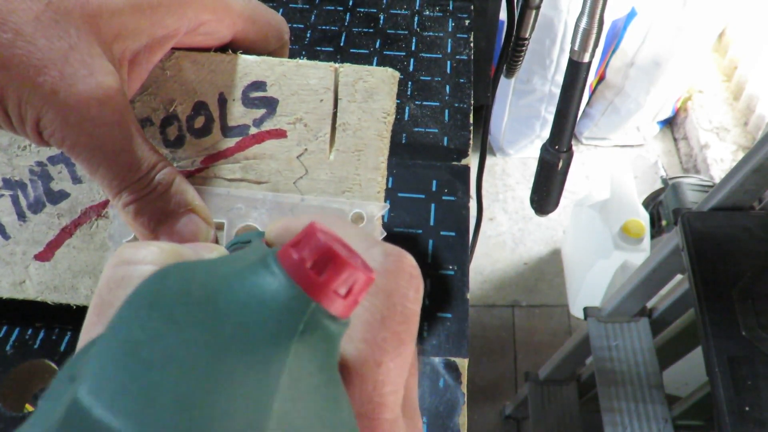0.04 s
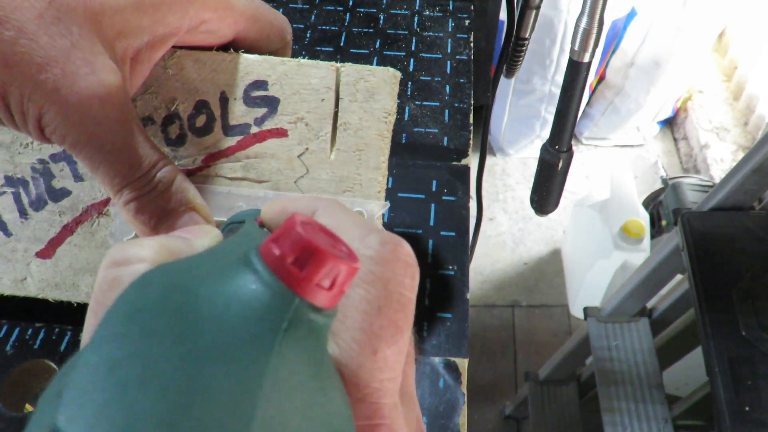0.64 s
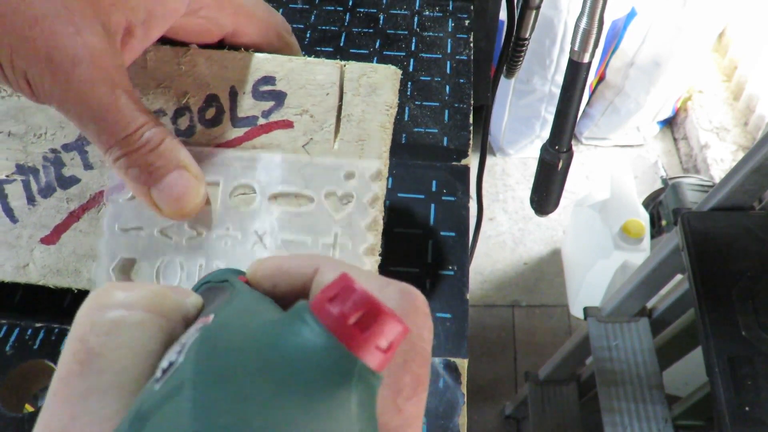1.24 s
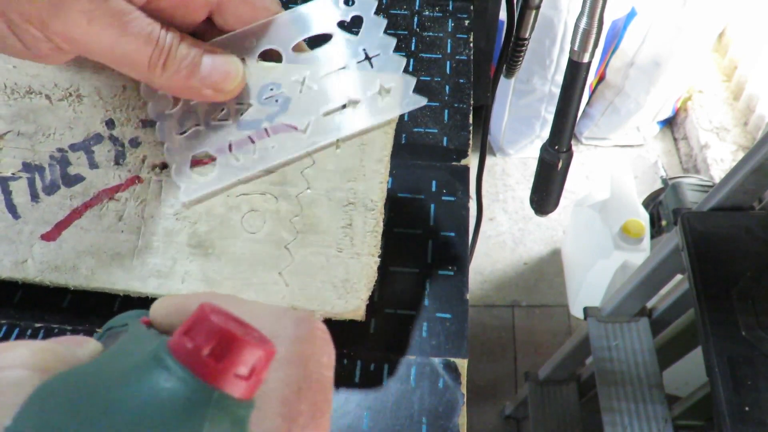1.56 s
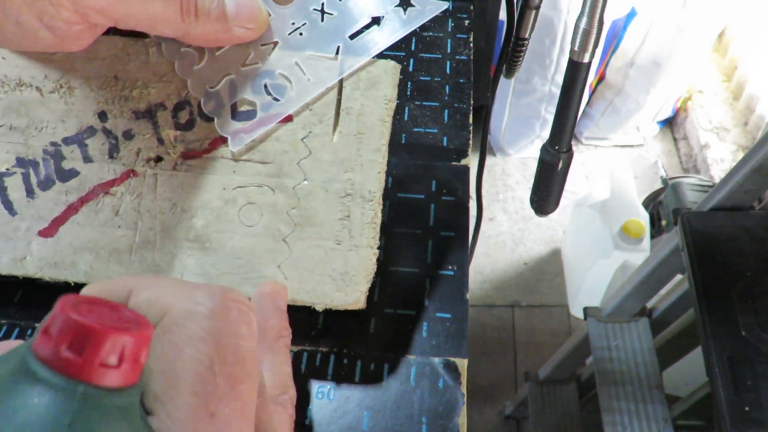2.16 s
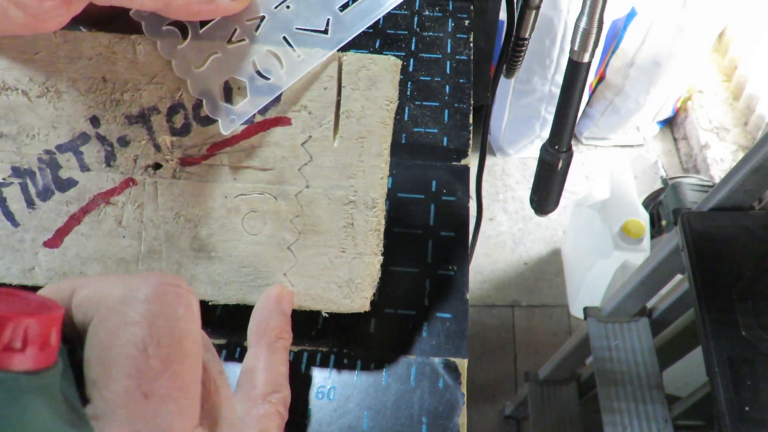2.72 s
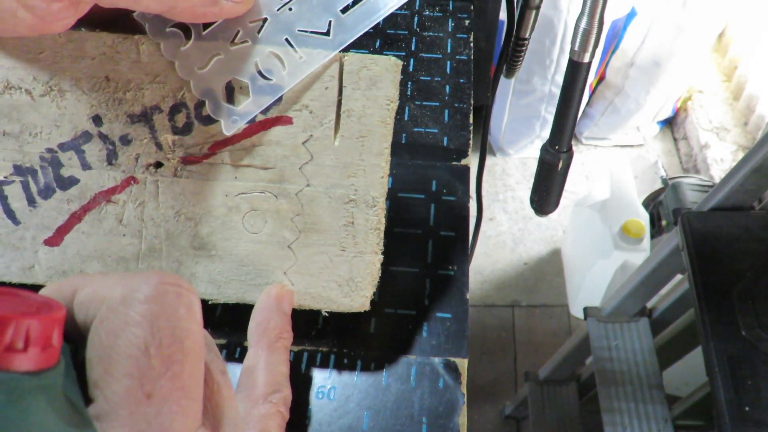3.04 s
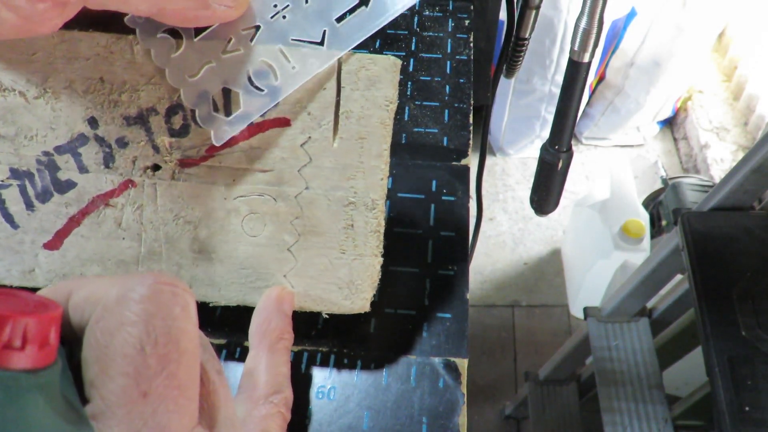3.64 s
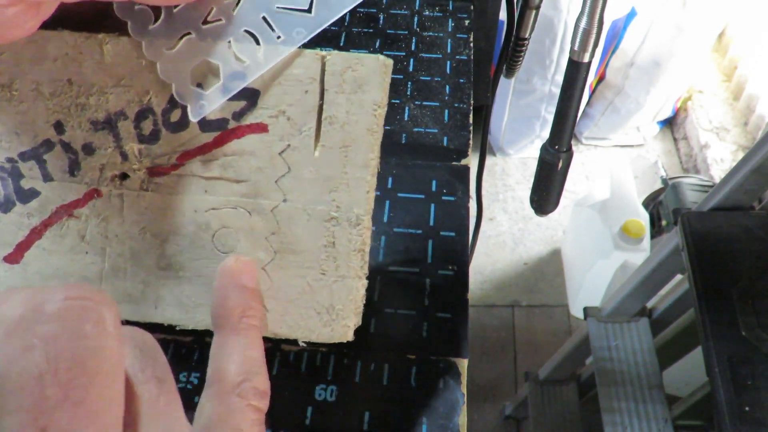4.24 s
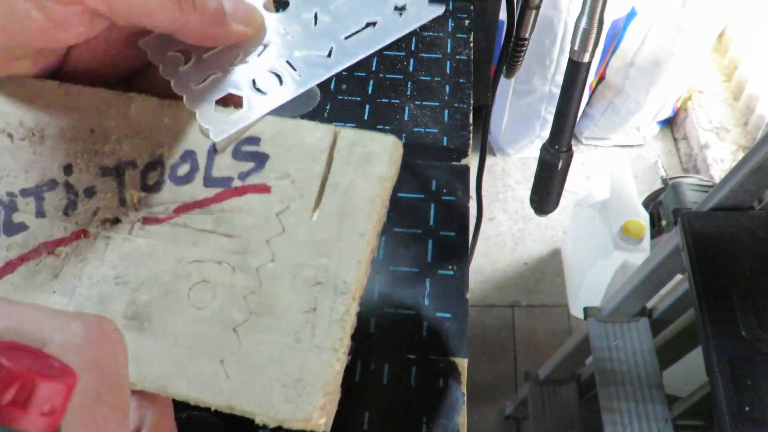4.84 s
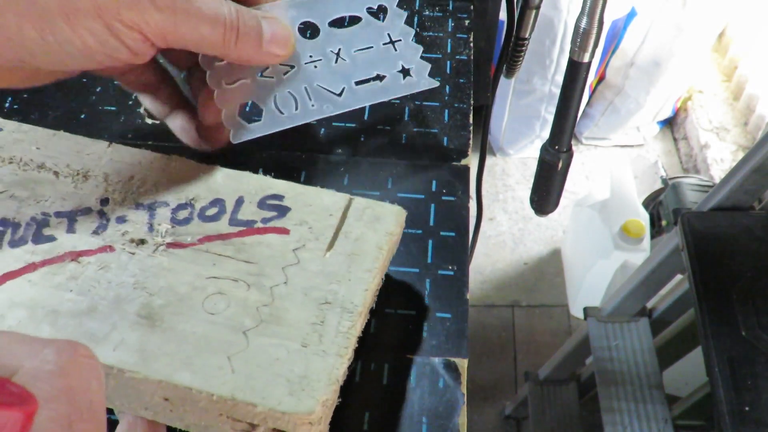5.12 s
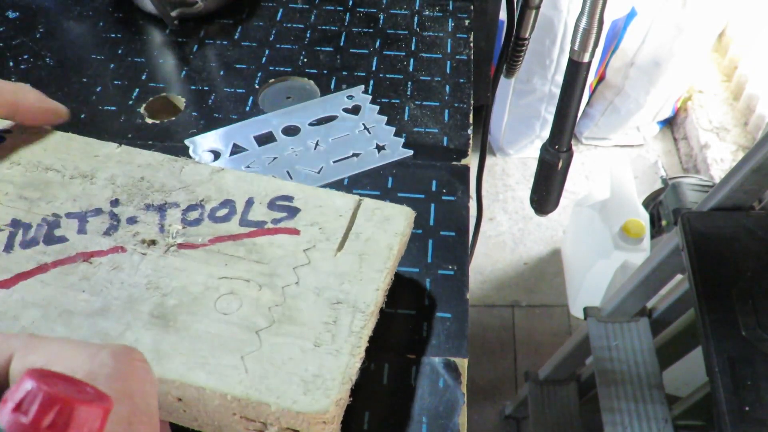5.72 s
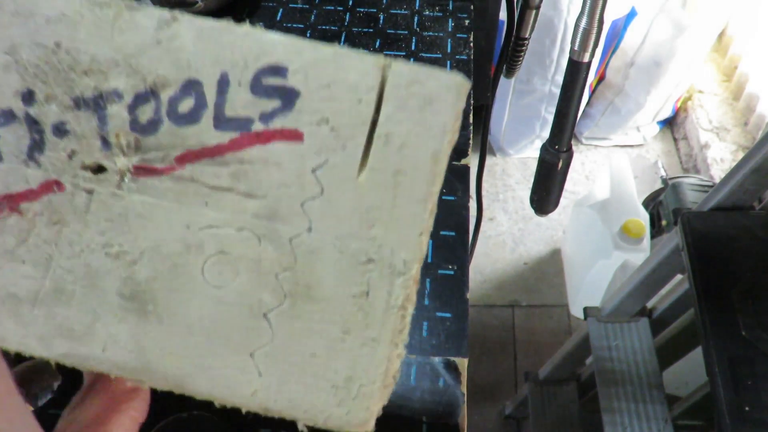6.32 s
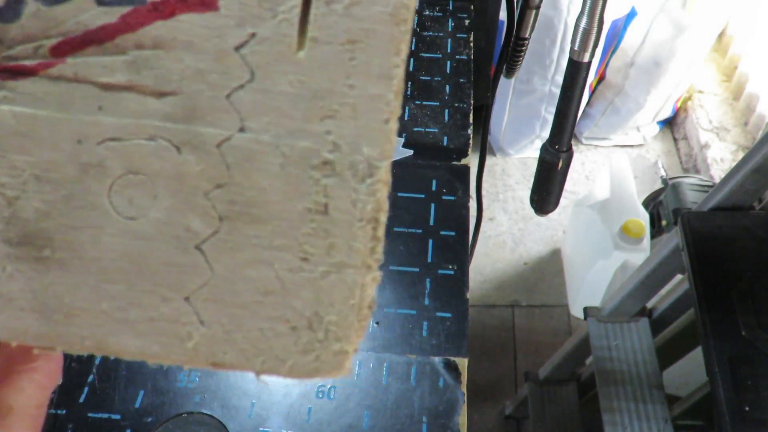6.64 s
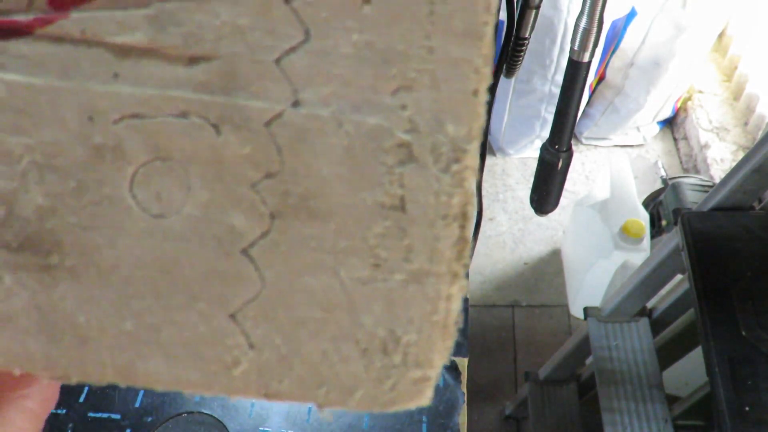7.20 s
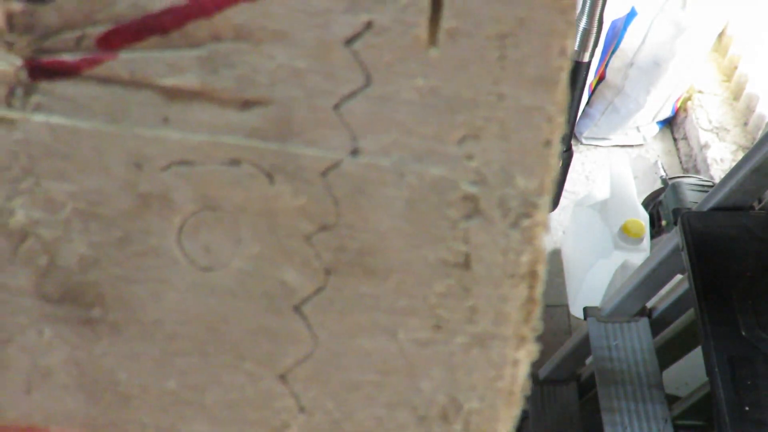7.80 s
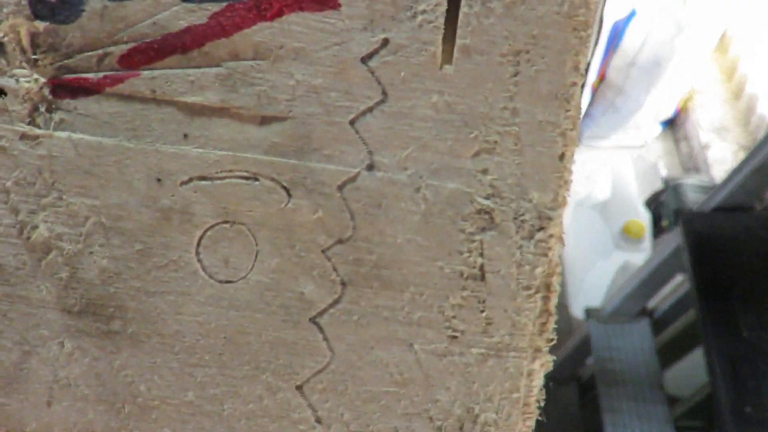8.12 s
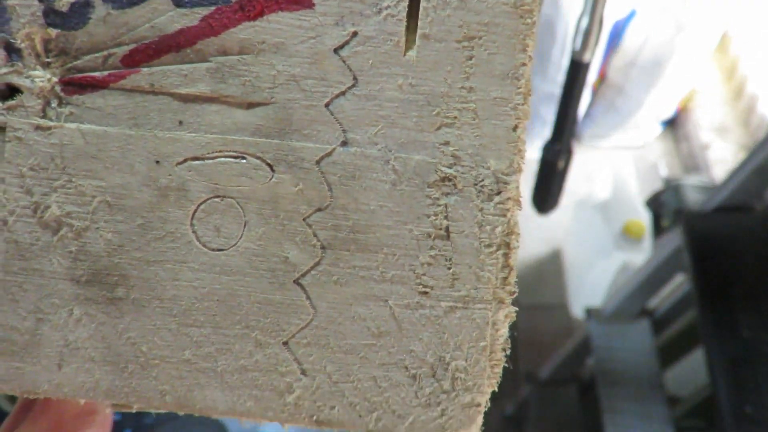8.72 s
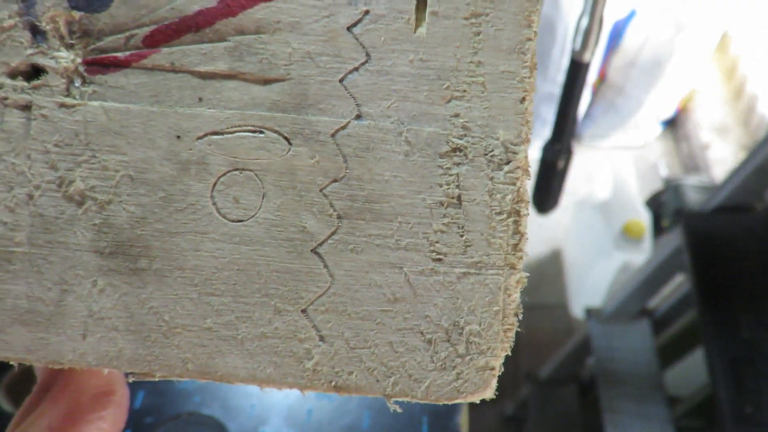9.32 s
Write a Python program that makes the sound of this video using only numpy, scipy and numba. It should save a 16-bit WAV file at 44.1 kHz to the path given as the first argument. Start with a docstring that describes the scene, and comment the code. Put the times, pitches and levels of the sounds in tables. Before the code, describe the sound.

Close up at a workbench open to a garden, an electric engraver hammers into a wooden board with a loud, harsh buzz. It chatters freely as it lifts and stops after about two seconds. Crickets, trilling frogs and whistling birds gradually swell in behind. The board bumps softly, then knocks sharply on the bench, and a plastic stencil ticks as it is put down. The garden sounds carry on to the end.

```python
"""At a workbench open to a garden, a mains engraver hammers its tip into a wooden board 100 times a second,
chatters freely when lifted, and stops. The board is bumped, knocked and rubbed on the bench, and a plastic
stencil ticks as it is put down. Outside, crickets chirp with their wings, frogs trill and birds whistle;
the camera's gain control pushes them down under each loud sound and lets them swell back."""
import sys
import numpy as np
from scipy import signal
from scipy.fft import rfft, irfft
from scipy.io import wavfile
from numba import njit

SR = 44100
rng = np.random.default_rng(int(sys.argv[2]) if len(sys.argv) > 2 else 0)


def inscribe(sig):
    """Save sig as 16-bit PCM at rate SR to the path in sys.argv[1].

    A 1-D sig is mono; a 2-D sig holds one channel per row.
    Samples are clipped to [-1, 1] before scaling.
    """
    pcm = np.round(np.clip(np.atleast_2d(sig).T, -1, 1) * 32767)
    wavfile.write(sys.argv[1], SR, pcm.astype(np.int16))


N = 421596
T = np.arange(N) / SR
SLOW = T[::32]  # clock for slow controls
TOOL_T, RING_T = T[:int(2.3 * SR)], T[:int(.12 * SR)]  # clocks for the tool's run and one stroke's ring
STROKE_HZ = 100
SKIP_BELOW, GRIP_ABOVE, TEAR_ABOVE = 0.268, 0.42, 0.679  # hand pressure (0-1): the tip skips, grips, tears

# Tone of the tip striking wood. Each row: frequency in Hz, gain in dB.
WOOD_TONE = [(60, -68), (150, -46), (300, -18), (500, -14.5), (800, -13.5), (1150, -9), (1600, -12),
             (2200, -6.5), (3000, -7.5), (4000, -6), (5000, -9), (6400, -8.5), (7500, -15), (14000, -14),
             (16000, -34)]


def undb(db):
    return 10 ** (np.asarray(db) / 20)


def unit(x):
    """Scale to rms 1."""
    return x / np.sqrt(np.mean(x ** 2))


def fade(t, t60):
    """A decay that loses 60 dB in t60 seconds."""
    return np.exp(-np.log(1000) * t / t60)


def ramp(x, start, end):
    """0 at start, 1 at end, flat beyond."""
    return np.clip((x - start) / (end - start), 0, 1)


def walk(rate, t):
    """A random drift with a spread near 1, turning rate times a second."""
    knots = rng.standard_normal(int(t[-1] * rate) + 2)
    return np.interp(t * rate, np.arange(len(knots)), knots)


def throb(hz, unsteady):
    """A sine on the slow clock, its rate drifting."""
    return np.sin(2 * np.pi * np.cumsum(hz * (1 + unsteady * walk(5, SLOW))) * SLOW[1])


def held(control):
    """Hold a slow control over every sample."""
    return np.repeat(control, 32)[:N]


def add(out, s, x):
    """Mix x in at s seconds."""
    i = int(s * SR)
    out[..., i:i + x.shape[-1]] += x[..., :N - i]


def through(x, response):
    """Pass a sound through an impulse response."""
    return signal.oaconvolve(np.atleast_2d(x), np.atleast_2d(response), axes=-1)[:, :x.shape[-1]]


def butter(x, order, hz, kind):
    return signal.sosfilt(signal.butter(order, hz, kind, fs=SR, output="sos"), x)


def colour(x, points):
    """Minimum-phase EQ through (Hz, dB) points."""
    hz, db = np.transpose(points)
    gain = undb(np.interp(np.log(np.fft.rfftfreq(2048, 1 / SR) + 1), np.log(hz), db))
    cepstrum = irfft(np.log(gain))
    cepstrum[1:1024] *= 2
    cepstrum[1025:] = 0
    return through(x, irfft(np.exp(rfft(cepstrum))))


def ports(pair):
    """Left and right microphone ports from a mid and a side: narrow in the mids, wide in the treble."""
    # Stereo width. Each row: frequency in Hz, side gain in dB.
    width = [(40, 0), (120, -31), (300, -21), (1300, -19), (2100, -28.5), (4400, -8.5), (8000, -1),
             (13000, 2)]
    return pair[0] + colour(pair[1], width) * np.array([[1], [-1]])


def echoes(envelope):
    """A diffuse stereo tail under an envelope."""
    return ports(rng.standard_normal((2, len(envelope))) * envelope / np.linalg.norm(envelope))


def scatter(envelope):
    """Dense stereo reflections under an envelope, evened out towards a flat spectrum."""
    size = len(envelope)
    limit = 3 * envelope / np.linalg.norm(envelope)
    reflections = rng.standard_normal((2, size)) * envelope
    for _ in range(3):
        spectrum = rfft(reflections, 2 * size)
        reflections = np.clip(irfft(spectrum / np.abs(spectrum))[:, :size], -limit, limit)
    return ports(reflections)


def band(hz, width_hz, size):
    """Two unrelated noises in one steep resonance."""
    section = np.concatenate(signal.iirpeak(hz, hz / width_hz / 1.5, fs=SR))
    return unit(signal.sosfilt([section, section], rng.random((2, size)) - .5))


def clicks(times, sizes):
    """Impulses on the tool's clock, placed finely between the samples."""
    at = np.maximum(times * SR, 8)[:, None]
    near = at.astype(int) + np.arange(-7, 9)
    shape = np.sinc(near - at) * np.sinc((near - at) / 8)
    return np.bincount(near.ravel(), (sizes[:, None] * shape).ravel(), len(TOOL_T))


def ring(modes, t, damping=1, sag_hz=0, sag_s=0.017):
    """Modes decaying after a blow; the lowest starts sag_hz sharp and sinks, higher ones less so."""
    extra_cycles = sag_hz * sag_s * (1 - np.exp(-t / sag_s))
    out = 0
    for hz, t60, db in modes:
        cycles = hz * t + extra_cycles * (modes[0][0] / hz) ** 2
        out += undb(db) * fade(t, t60 / damping) * np.cos(2 * np.pi * cycles)
    return out


def resonate(strokes, hz, t60):
    """A resonance rung by every stroke while its pitch moves."""
    turn = np.exp(2j * np.pi * np.cumsum(hz) / SR)
    t = T[:SR // 10]
    return unit(np.imag(turn * through(strokes / turn, fade(t, t60) - fade(t, t60 / 3))))


def sweep(length, start_hz, end_hz, waver, bend=1, soft=0.37):
    """A soft-edged gliding tone; with a bend under 1 it glides fastest at first."""
    t = T[:int(length * SR)]
    hz = (start_hz + (end_hz - start_hz) * (t / length) ** bend) * (1 + waver * walk(303.2, t))
    return np.sin(2 * np.pi * np.cumsum(hz) / SR) * signal.windows.tukey(len(t), soft)


def garden(x, wet_db, t60, pan_db=2):
    """A far call arrives from a little to the right, with echoes from walls and leaves."""
    t = T[:int(.6 * SR)]
    direct = ports(np.array([x, np.roll(x, 3)]))
    tail = through(x, echoes(fade(t, t60) * (1 - 0.15 * fade(t, 0.097))))
    return (direct + undb(wet_db) * tail) * undb(np.array([[-pan_db], [pan_db]]) / 2)


def hand(t):
    """The hand's pressure and what follows from it: contact, glancing and tearing, each 0-1."""
    # The hand digs the tip in, eases off, then lifts it. Each row: time in seconds, pressure from 0 to 1.
    gesture = [(0, 0.41), (.65, 0.47), (.85, 0.79), (.93, 0.83), (1.065, 0.9), (1.105, 0.84), (1.16, 0.26),
               (1.5, 0.27), (1.61, 0.21), (1.665, 0.18), (1.7, 0.07)]
    pressure = np.interp(t, *np.transpose(gesture))
    contact = ramp(pressure, 0, SKIP_BELOW)
    glancing = contact * ramp(pressure, GRIP_ABOVE, SKIP_BELOW)
    return pressure, contact, glancing, ramp(pressure, TEAR_ABOVE, 1)


def hammering(first_s=.0059, count=194, click_t60=0.021, porch_t60=0.12, porch_db=-8):
    """Stroke times and blows: the tip lands, rattles and rebounds; unloaded, it limps strong-weak."""
    # Contacts within a stroke. Each row: delay as a share of the rebound time, relative level in dB.
    contacts = [(0, -11.5), (0.252, -29), (0.422, -8), (0.999, -11.5), (1.377, -11.5)]
    # Tone of the blows in free air. Each row: frequency in Hz, gain in dB.
    free_tone = [(47, -70), (80, -29), (271, -40), (420, -21), (560, -9), (820, -0.5), (1120, 1),
                 (1490, -10.5), (1860, 0), (2270, -10.5), (2600, -11), (3100, -8.5), (3700, -2.5),
                 (4650, -7.5), (5000, -8.5), (6030, -7.5), (7000, -10), (8600, -18), (14000, -9.5),
                 (16000, -12)]
    beat = first_s + np.arange(count) / STROKE_HZ
    _, touch, _, tear = hand(beat)
    airborne = ramp(touch, 0.502, 0)
    rebound_ms = (1 - airborne) * (2.65 + 0.174 * beat) + airborne * 1.61  # creeps up along the groove
    skipping = 6.5 * touch * (1 - touch) ** 2
    jitter_ms = 0.0075 + 0.011 * tear + 0.337 * skipping + 0.212 * airborne
    limp_ms = 1.4 * ramp(beat, 1.74, 1.83)
    swing_ms = limp_ms * (-1) ** np.arange(count)
    starts = beat + (swing_ms + 0.25 * limp_ms + jitter_ms * rng.standard_normal(count)) / 1000
    grains_crossed = np.cumsum(6.03 + 14.5 * tear) / STROKE_HZ
    blows = 0
    for share, db in contacts:
        lag_ms = share * (rebound_ms + 0.029 * walk(9.03, beat) + jitter_ms * rng.standard_normal(count))
        uneven_db = (1.76 + 1.6 * airborne) * rng.standard_normal(count)
        force = undb(db + uneven_db - 1.4 * swing_ms)  # late strokes are weak
        # the wood answers a little differently as the tip moves over the grain
        grain = 0.92 * walk(0.97, grains_crossed)
        for weight in (np.cos(grain), np.sin(grain)):
            response = scatter(fade(RING_T, click_t60)) + undb(porch_db) * echoes(fade(RING_T, porch_t60))
            blows += through(clicks(starts + lag_ms / 1000, weight * force), response)
    _, contact, glancing, tearing = hand(TOOL_T)
    on_wood = np.sqrt(contact) * unit(colour(blows, WOOD_TONE))
    in_air = 0.95 * np.sqrt(1 - contact) * unit(colour(blows, free_tone))
    blows = on_wood + in_air
    extra_treble = undb(0.5 + 3.5 * glancing + 1.7 * tearing) - 1
    return starts, blows + extra_treble * butter(blows, 1, 7000, "high")


def housing_buzz(strokes, contact):
    """Every stroke rings the tool's housing, harder when the tip meets wood."""
    # Housing modes. Each row: frequency in Hz, t60 in seconds, relative level in dB.
    modes = [(274, 0.03, -16), (504, 0.033, -2), (678, 0.051, -1.5), (1390, 0.02, 7.5), (1914, 0.036, 9.5),
             (2619, 0.12, 7.5), (3910, 0.037, 1)]
    return undb(9) * (0.34 + 0.79 * contact) * unit(through(strokes, ring(modes, RING_T)))


def board_drone(strokes, contact):
    """The strokes drive the board's main resonance, which sinks as the hand eases off."""
    # Path of that resonance. Each row: time in seconds, pitch in Hz.
    pitch_path = [(0, 1100), (1.09, 1100), (1.14, 1025), (1.5, 1020), (1.57, 940), (1.9, 940)]
    hz = np.interp(TOOL_T, *np.transpose(pitch_path))
    return undb(14) * (0.032 + 0.6 * contact) * resonate(strokes, hz, t60=0.027)


def scrape(strokes, gate, contact, tearing, tear_db=16):
    """The cut rasps and the fibres ring, far louder while they tear."""
    # Torn fibres. Each row: frequency in Hz, t60 in seconds, relative level in dB.
    modes = [(1273, 0.074, 1.5), (1476, 0.027, 0.5), (1760, 0.011, 1.5), (3634, 0.011, -2.5),
             (4050, 0.019, 2), (4320, 0.009, -6), (4840, .014, -5)]
    fibres = sum(undb(db) * resonate(strokes, hz * (1 + .015 * walk(24.96, TOOL_T)), t60)
                 for hz, t60, db in modes)
    rasp = undb(-2) * gate * ports(band(1600, 1100, len(TOOL_T)))
    return (rasp + fibres) * contact * undb(-1.5 + tear_db * tearing)


def tip_ring(strokes, swell_s=0.14, unfavoured_db=-5, tear_db=-5, detune=0.0023, grain_hz=13.9):
    """The tip's modes swell in turn as the cut curves; the grain detunes them and tearing lowers them."""
    # Modes of the tip and holder. Each row: frequency in Hz, t60 in seconds, relative level in dB under
    # a light hand, the same under a firm hand, time in seconds when the cut's direction favours it most.
    modes = [(1764, 0.024, -5, 6, 0.54), (1895, 0.044, -1.5, -5, .2), (2605, 0.16, 1, 7.5, .55),
             (2842, 0.091, -1, 5.5, 0.94), (3240, 0.034, 0, -17, .3), (3520, 0.041, -15, 3.5, 1),
             (3630, .08, 0, -6, 0.65), (3900, 0.026, 7.5, -11, .1), (4100, 0.02, -10, 6, .62),
             (4565, 0.03, 9, -11, .05), (4855, 0.021, -11, 6, 0.5), (5450, 0.019, -3, 10.5, 0.079),
             (5850, 0.017, -18, 8.5, .75), (6470, 0.02, 0, 1, 0.73), (6750, 0.043, -8, 2, .05)]
    pressure, contact, _, tearing = hand(TOOL_T)
    firm = ramp(pressure, SKIP_BELOW, GRIP_ABOVE)
    out = 0
    for hz, t60, light_db, firm_db, favoured_s in modes:
        favour = np.exp(-.5 * ((TOOL_T - favoured_s) / swell_s) ** 2)
        cutting_db = firm_db + unfavoured_db * (1 - favour)
        flicker_db = 0.5 * walk(grain_hz, TOOL_T)
        db = light_db + (cutting_db - light_db) * firm + tear_db * tearing + flicker_db
        out += undb(db) * resonate(strokes, hz * (1 + detune * walk(grain_hz, TOOL_T)), t60)
    return contact ** 2 * out


def tip_skid(strokes, contact):
    """A tiny falling chirp in every stroke, strongest as the tip skids just before leaving the wood."""
    skidding = np.exp(-((contact - 0.88) / 0.11) ** 2)
    chirp = sweep(length=0.0024, start_hz=4710, end_hz=3680, waver=0)
    return undb(13) * skidding * unit(through(strokes, chirp))


def close_up(pair):
    """The tool is so close that the two ports hear its treble less alike."""
    # Width at close range. Each row: frequency in Hz, extra side gain in dB.
    near_width = [(1400, -15.5), (1800, -28), (2200, 19), (2700, 10.5), (4000, 4.5), (5500, 3.5),
                  (7000, -2), (11000, 1), (13200, -1.5), (15000, 6.5)]
    mid, side = (pair[0] + pair[1]) / 2, (pair[0] - pair[1]) / 2
    return mid + colour(side, near_width) * np.array([[1], [-1]])


def engraver(press_db=5.5):
    """One train of strokes drives the housing, board, fibres and tip; pressing makes it all louder."""
    starts, blows = hammering()
    pressure, contact, _, tearing = hand(TOOL_T)
    _, touch, _, _ = hand(starts)
    strokes = clicks(starts, (0.75 + 0.28 * touch) * undb(0.96 * rng.standard_normal(len(starts))))
    gate = unit(through(strokes, fade(RING_T, 0.055) - fade(RING_T, 0.001)))  # noise pulses with each stroke
    tool = undb(16.5) * blows + housing_buzz(strokes, contact) + board_drone(strokes, contact)
    tool += tip_skid(strokes, contact) + scrape(strokes, gate, contact, tearing)
    grit = unit(colour(ports(rng.standard_normal((2, len(TOOL_T)))), WOOD_TONE))
    tool += undb(4) * (0.5 + 0.9 * contact) * gate * grit + tip_ring(strokes)
    # a small tool radiates little bass; a faint rumble lies under it, stronger when it shakes freely
    tool = butter(tool, 3, 290, "high")
    rumble = undb(-22 + 9 * (1 - contact)) * gate * ports(band(85, 110, len(TOOL_T)))
    out = np.zeros((2, N))
    add(out, 0, undb(-11.5 + press_db * pressure) * (close_up(tool) + rumble))
    return out


def far_chorus(bed_db=-44, drift_db=3):
    """Distant insects and frogs, each kind pulsing in its own band, over a soft bed of noise."""
    # Outdoor background noise with a steady, high microphone hiss. Each row: frequency in Hz, gain in dB.
    bed_tone = [(30, 4.5), (100, -0.5), (160, -6), (230, -3.5), (380, -1), (800, 0), (1400, 1.5), (2100, 3),
                (2750, 2), (3700, -1), (4400, 0.5), (6000, -16.5), (7500, -0.5), (8500, -9.5),
                (12300, -5.5), (13200, 3), (13900, -3), (14500, -31), (15000, -59.5)]
    # The callers. Each row: pitch in Hz, bandwidth in Hz, level in dB, pulses a second, pulse depth in dB.
    callers = [(1016, 65, -57, 3.9, 6), (1580, 75, -60, 4, 10), (1990, 140, -48, 33, 1.5),
               (2405, 170, -52.5, 6, 2.5), (2874, 90, -55, 19, 3.5), (3003, 72, -48.5, 33, 0),
               (3500, 190, -63, 9, 5), (3940, 160, -51, 28, 2.5), (4406, 120, -46.5, 29, 3),
               (4940, 145, -43, 27, 0.5), (5290, 570, -46, 47, -2), (5506, 86, -46.5, 21, -1.5),
               (6540, 260, -50.5, 23, 0.5), (6825, 69, -54.5, 17, 5.5)]
    out = held(undb(bed_db + .5 * walk(1.318, SLOW))) * unit(colour(rng.standard_normal((2, N)), bed_tone))
    for hz, width_hz, db, pulse_hz, depth_db in callers:
        pulsing = unit(undb(depth_db * throb(pulse_hz, 0.1506) + drift_db * walk(5, SLOW)))
        out += held(undb(db) * pulsing) * band(hz, width_hz, N)
    return out


def board_knocks(crack_t60=0.017, tail_db=-16, tail_t60=0.15):
    """The board cracks against the bench and rings, duller for a softer contact."""
    # Knocks. Each row: start in seconds, ring gain in dB, crack gain in dB, brightness as a cutoff in Hz,
    # damping by the hand as a factor (1 is free).
    knocks = [(1.134, 12, -14, 282, 3.9), (2.448, -14.5, -19, 570, 1.64), (2.476, -14, -24, 234, 1),
              (4.147, -43, -21, 1200, 2.3), (5.1837, 2.5, 29, 3550, 0.96), (5.2, -26.5, -8, 2400, 1.3),
              (5.206, -28, -4, 1600, 2), (5.217, -17, -8, 2500, 1.9), (5.2321, -26.5, -5, 2600, 2.5),
              (5.2457, -16, 1, 2100, 2.6), (5.607, -36, -13, 1100, 2.4)]
    # Modes of the free board. Each row: frequency in Hz, t60 in seconds, relative level in dB.
    modes = [(286, 0.19, -12.5), (358, 0.043, -24), (472, 0.15, -3), (620, 0.094, -17.5),
             (890, 0.16, -11.5), (1124, 0.18, 8), (1660, 0.028, -5), (1630, 0.024, 6.5), (2650, 0.031, 3),
             (3360, 0.048, -11)]
    # Tone of wood cracking on the bench. Each row: frequency in Hz, gain in dB.
    crack_tone = [(40, -35), (160, -45), (280, 3), (700, -8.5), (1600, 9), (3000, -1.5), (6000, -18),
                  (15000, -26.5)]
    out, t = np.zeros((2, N)), T[:SR // 2]
    for s, ring_db, crack_db, bright_hz, damping in knocks:
        crack = colour(scatter(fade(t, crack_t60)) + undb(tail_db) * echoes(fade(t, tail_t60)), crack_tone)
        body = ring(modes, t, damping, sag_hz=50)  # pressed against the bench, it starts sharp
        knock = undb(ring_db) * body + undb(crack_db) * crack / np.abs(crack).max()
        add(out, s, butter(knock, 2, [140, bright_hz], "band"))
    return out


def birds_and_far_frogs(rise_ratio=1.363, rise_s=.084, top_note_hz=7970):
    """A bird's rising whistles, smeared by echoes; short bird peeps and the held notes of distant frogs."""
    # Rising whistles. Each row: start in seconds, starting pitch in Hz, relative level in dB.
    whistle_notes = [(3.18, 3170, -43.5), (3.52, 6500, -36.5), (4.41, 3100, -43), (6.04, 3180, -42),
                     (6.2, 6440, -30), (6.887, 5670, -29), (6.93, 3000, -41.5), (7.274, 5560, -28),
                     (7.55, 3240, -39.5), (7.645, 5690, -27.5), (8.031, 5580, -29.5), (8.615, 3240, -42),
                     (9.4, 3100, -38)]
    # Bird peeps and frog notes. Each row: start and length in seconds, first and last pitch in Hz,
    # relative level in dB.
    short_calls = [(2.47, 0.041, 2280, 2560, -43), (2.515, 0.044, 1450, 1300, -48),
                   (2.572, 0.059, 2160, 1960, -50), (2.66, 0.051, 2330, 2540, -38.5),
                   (2.776, .06, 1590, 1320, -48), (2.892, 0.046, 1027, 980, -50),
                   (2.915, 0.05, 2000, 1910, -45), (3.058, 0.05, 1400, 1305, -49),
                   (3.093, .035, 3430, 3520, -46), (3.13, 0.06, 7600, 7330, -46),
                   (3.221, 0.12, 2076, 2030, -44.5), (3.442, 0.041, 1890, 2230, -51),
                   (3.499, 0.07, 1042, 1010, -55), (3.6, 0.071, 1670, 1480, -47),
                   (3.659, 0.1, 3000, 2980, -44.5), (3.917, 0.047, 1366, 1310, -48),
                   (3.932, 0.05, 7350, 7500, -44.5), (3.936, 0.065, 2020, 2030, -42.5),
                   (4.501, .14, 2025, 1940, -43), (4.78, 0.13, 3430, 3500, -50),
                   (7.52, 0.08, 8420, 8340, -38), (7.899, 0.1, 8400, 8160, -47),
                   (8.953, 0.048, 7500, 7470, -41)]
    whistles, calls = np.zeros((2, N))
    for s, start_hz, db in whistle_notes:
        end_hz = min(start_hz * rise_ratio, top_note_hz)
        add(whistles, s, undb(db) * sweep(rise_s, start_hz, end_hz, waver=0.0247, bend=0.99))
    for s, length, start_hz, end_hz, db in short_calls:
        add(calls, s, undb(db) * sweep(length, start_hz, end_hz, waver=0.0082))
    return undb(-4) * garden(whistles, wet_db=4, t60=0.53) + undb(1.5) * garden(calls, wet_db=-4, t60=0.56)


def cricket(spacing_s=.033, stroke_s=.026, high_hz=5220, low_hz=4450, fall_t60=0.12):
    """Three wing strokes a chirp, each falling in pitch as the wing slows."""
    # A near cricket's chirps. Each row: time of the middle stroke in seconds, level in dB.
    chirps = [(2.61, -37), (2.887, -29.5), (3.137, -29), (3.405, -32.5), (3.665, -30), (3.925, -29.5),
              (4.19, -29.5), (4.44, -28.5), (4.697, -29), (4.955, -34), (5.368, -27), (5.59, -26.5),
              (5.841, -25.5), (6.133, -22), (6.95, -29.5), (7.184, -31.5), (7.439, -28), (7.69, -30),
              (7.95, -28), (8.189, -30), (8.468, -29), (8.69, -28.5), (8.947, -32), (9.229, -32),
              (9.5, -28)]
    out = np.zeros(N)
    for s, db in chirps:
        for k in (-1, 0, 1):
            start_hz = high_hz * (1 + 0.011 * rng.standard_normal())
            stroke = sweep(stroke_s, start_hz, low_hz, waver=0.014, soft=0.43)
            stroke *= fade(T[:len(stroke)], fall_t60)
            add(out, s + k * spacing_s - stroke_s / 3, undb(db + rng.standard_normal()) * stroke)
    return garden(out, wet_db=-0.5, t60=0.18)


def stencil_ticks(tick_t60=0.0065, tail_db=-14, tail_t60=0.1):
    """The plastic stencil lands in bright ticks, each with a short, noisy echo."""
    # Ticks. Each row: start in seconds, peak level in dB.
    ticks = [(3.339, -10.5), (5.455, -16), (5.602, -7), (5.605, -14), (5.611, -20), (5.774, -5.5),
             (5.775, -10)]
    out, t = np.zeros((2, N)), T[:SR // 2]
    for s, db in ticks:
        click = scatter(fade(t, tick_t60)) + undb(tail_db) * echoes(fade(t, tail_t60))
        tick = colour(click, [(200, -62), (600, 0), (3500, 7), (9000, 2), (14000, 10), (16000, 12.5)])
        add(out, s, undb(db) * tick / np.abs(tick).max())
    return out


def board_rubs(width_hz=60):
    """Friction on hand and bench swells softly in one resonance of the board."""
    # Rubs. Each row: start in seconds, length in seconds, resonance in Hz, level in dB.
    rubs = [(3.752, 0.52, 330, -63), (5.019, 0.16, 1116, -42.5), (7.449, 0.79, 444, -58),
            (8.501, 0.26, 546, -54.5)]
    out = np.zeros((2, N))
    for s, length, hz, db in rubs:
        size = int(length * SR)
        add(out, s, undb(db) * np.hanning(size) * band(hz, width_hz, size))
    return out


def frog(pitch_hz=2070, width_hz=150, pulse_hz=70, swell_s=0.067, spacing_s=.2):
    """Bouts of short, evenly spaced trills: a throat resonance pulsed quickly."""
    # Bouts. Each row: first trill in seconds, last trill in seconds, level in dB.
    bouts = [(4.56, 4.8, -45.5), (6.22, 6.5, -45.5), (6.98, 7.76, -41.5), (8.21, 8.46, -38),
             (9.27, 9.3, -45.5)]
    swell = 0
    for first, last, db in bouts:
        for s in np.linspace(first, last, round((last - first) / spacing_s) + 1):
            swell += undb(db) * np.exp(-.5 * ((SLOW - s) / swell_s) ** 2)
    pulses = unit(1 + 0.15 * throb(pulse_hz, 0.1))
    return held(swell * pulses) * band(pitch_hz, width_hz, N)


def late_insect(joins_s=5.8, rise_s=0.61, hz=5510, width_hz=90, db=-48, trill_hz=14, depth_db=6):
    """One more insect joins the chorus with a high, pulsing trill."""
    trill = unit(undb(depth_db * throb(trill_hz, 0.2) + 2.1 * walk(6, SLOW)))
    return held(ramp(SLOW, joins_s, joins_s + rise_s) * undb(db) * trill) * band(hz, width_hz, N)


def scene():
    """The bench work up close, the garden behind it."""
    bench = engraver() + board_knocks() + stencil_ticks()
    calls = cricket() + birds_and_far_frogs()
    return bench + calls + ports(frog() + far_chorus() + late_insect() + board_rubs())


@njit
def ducking(excess_db, attack, release, cut_db):
    """Gain reduction in dB: from cut_db, it jumps up with the excess level and relaxes slowly."""
    out = np.empty(len(excess_db))
    for i in range(len(excess_db)):
        cut_db += max(excess_db[i] - cut_db, 0.) * attack - cut_db * release
        out[i] = cut_db
    return out


def record(dry, limit_db=-9.5, attack_s=0.0029, release_s=0.58, low_cut_hz=200, top_hz=16000):
    """Gain control ducks under loud sound; what is too fast for it clips. Bass and extreme top are cut."""
    start_cut_db = 28.5  # already ducked by the running tool
    excess_db = 20 * np.log10(np.abs(dry).max(axis=0) + 1e-9) - limit_db
    cut_db = ducking(excess_db, 1 / (attack_s * SR), 1 / (release_s * SR), start_cut_db)
    clipped = np.clip(dry * undb(-cut_db), -1, 1)
    thin = butter(clipped, 2, low_cut_hz, "high")
    return signal.sosfilt(signal.ellip(10, .2, 90, top_hz, fs=SR, output="sos"), thin)


dry = scene()
out = record(dry)
inscribe(out)
```